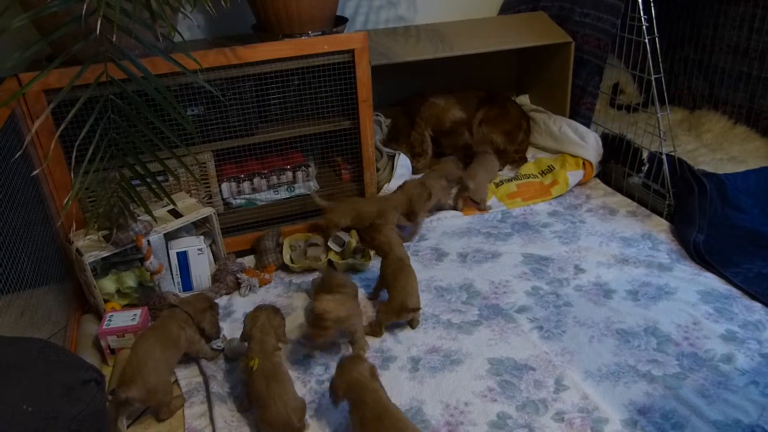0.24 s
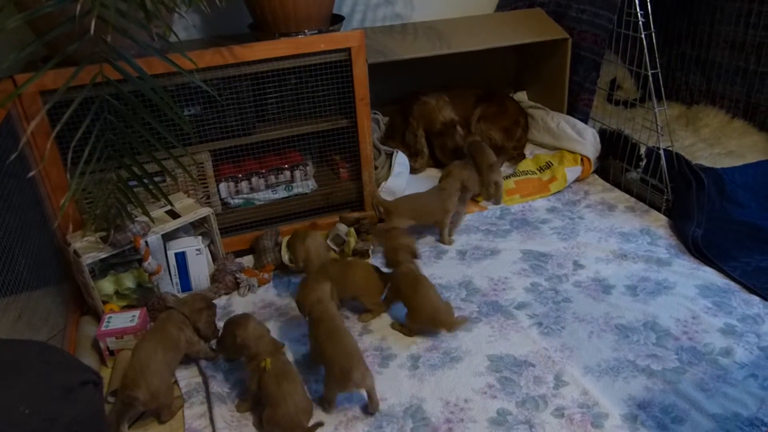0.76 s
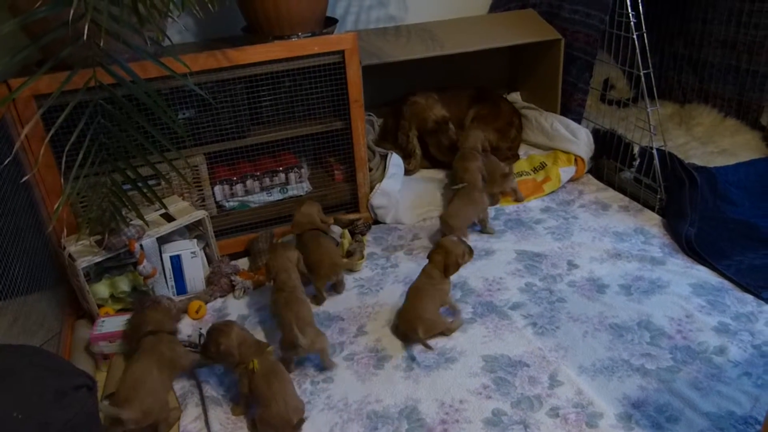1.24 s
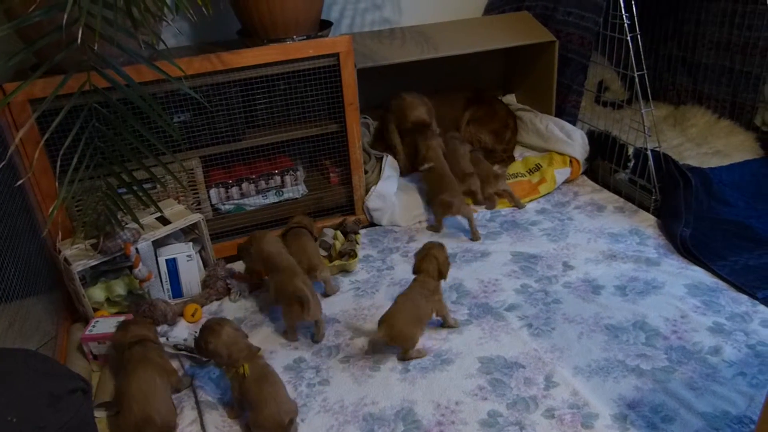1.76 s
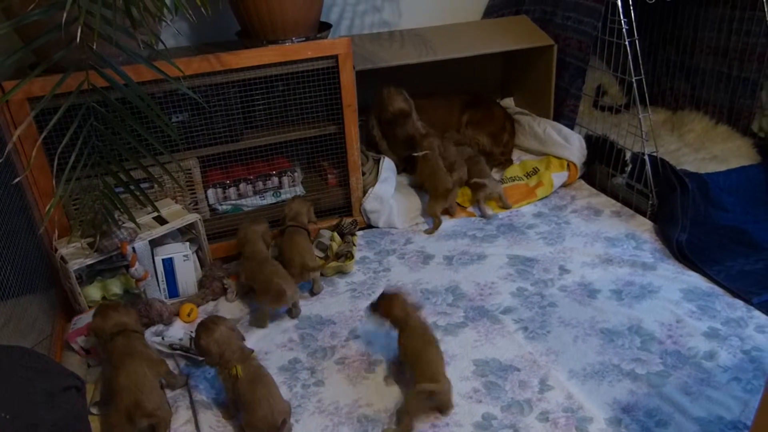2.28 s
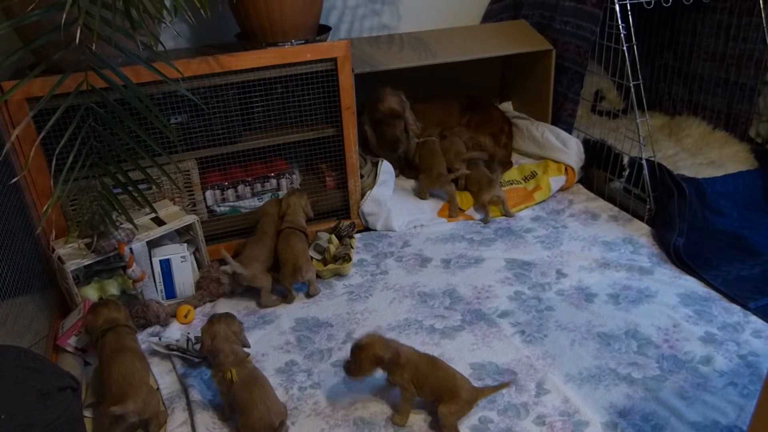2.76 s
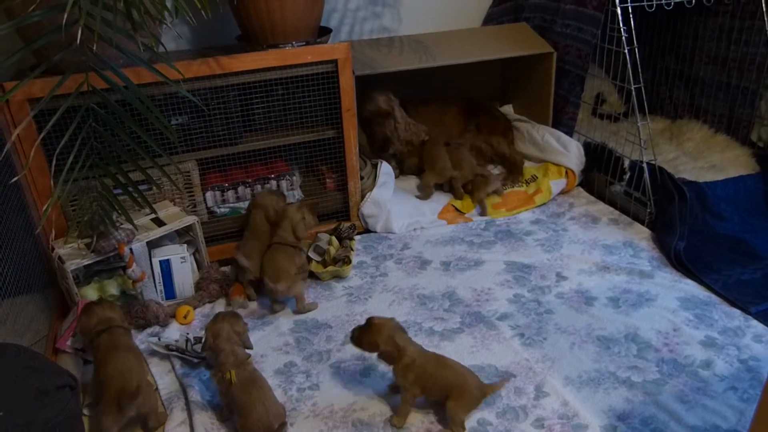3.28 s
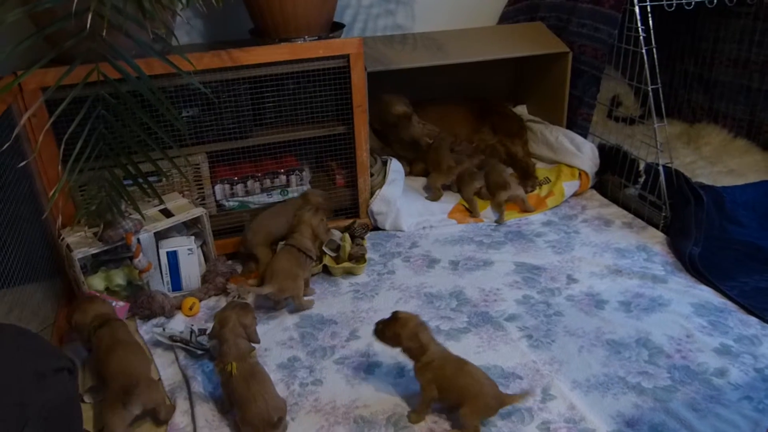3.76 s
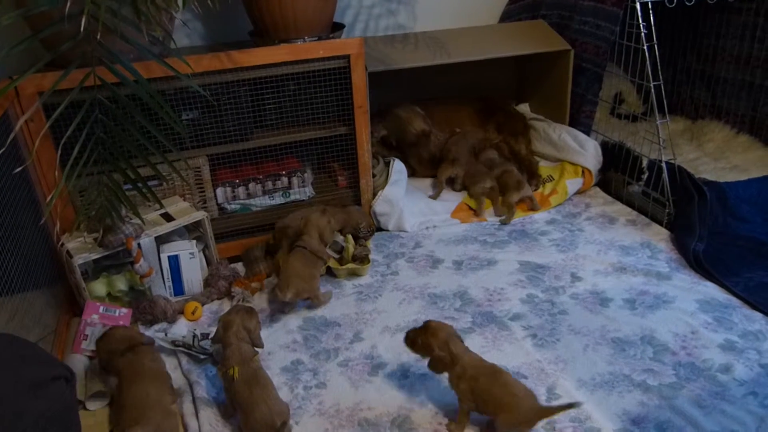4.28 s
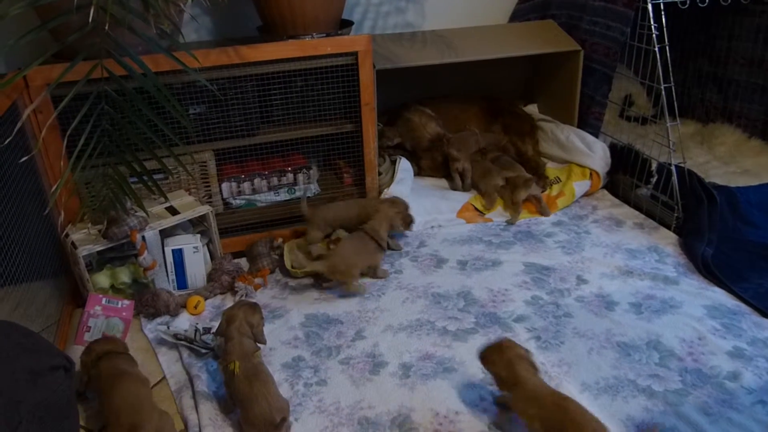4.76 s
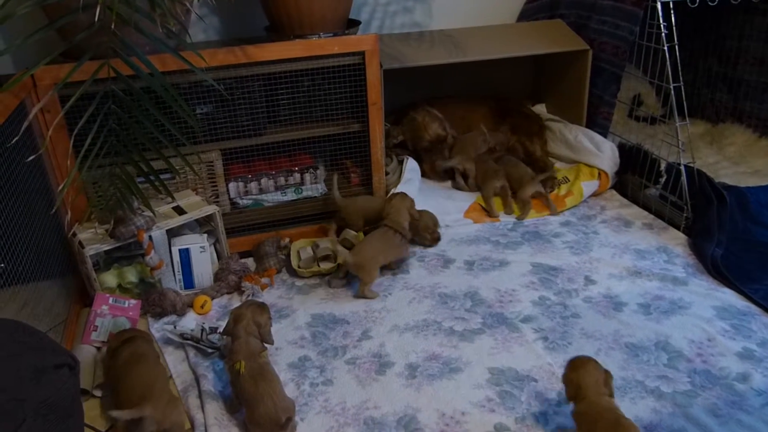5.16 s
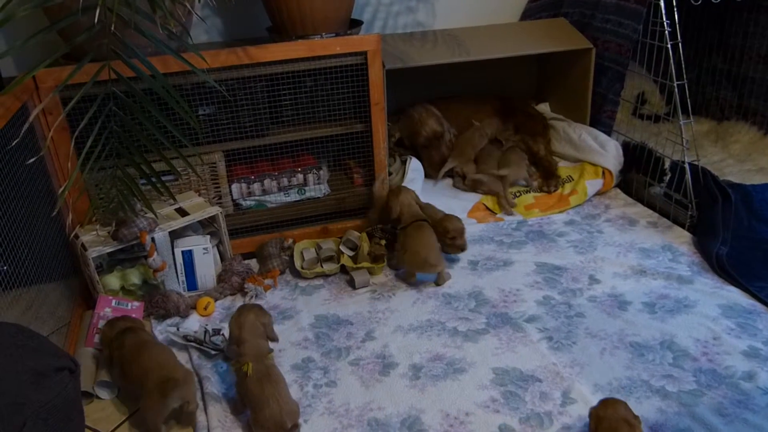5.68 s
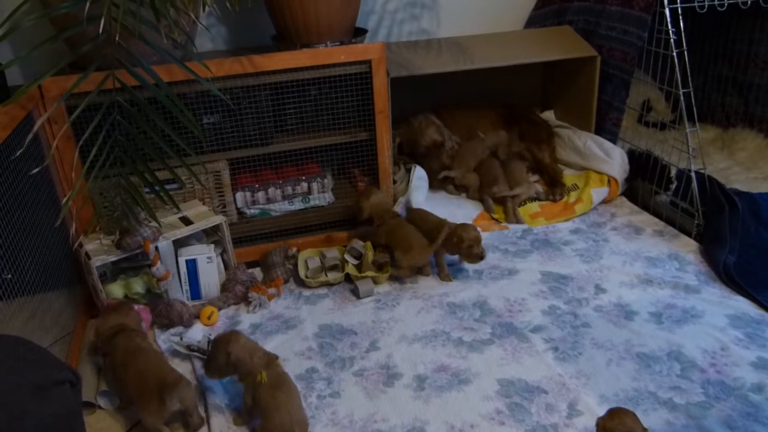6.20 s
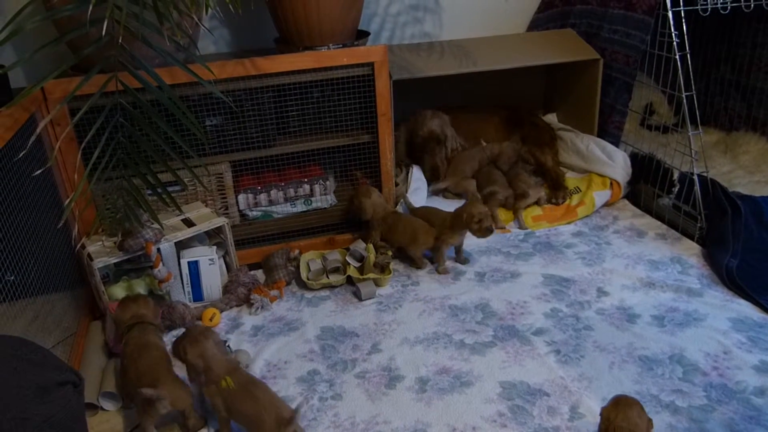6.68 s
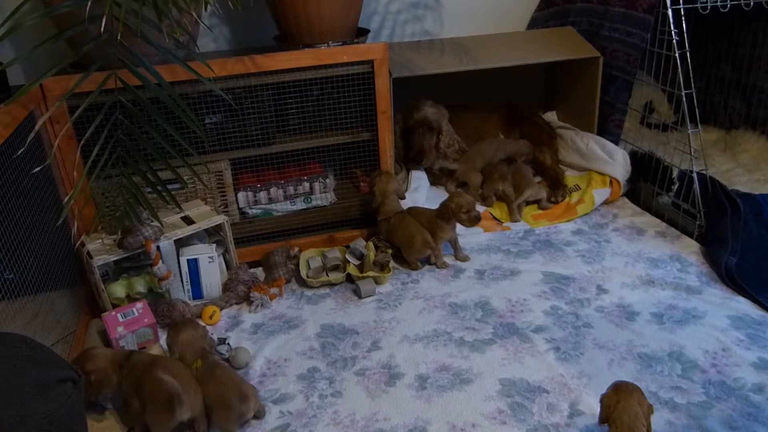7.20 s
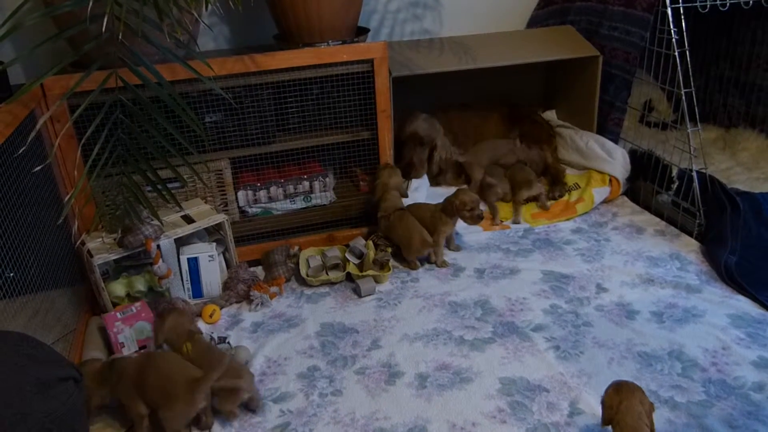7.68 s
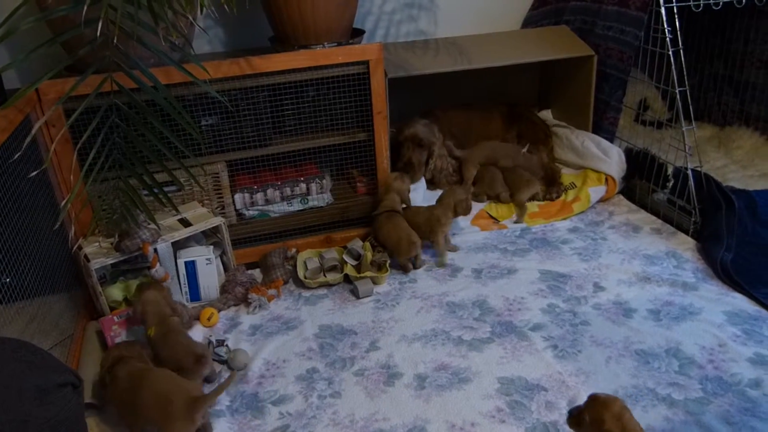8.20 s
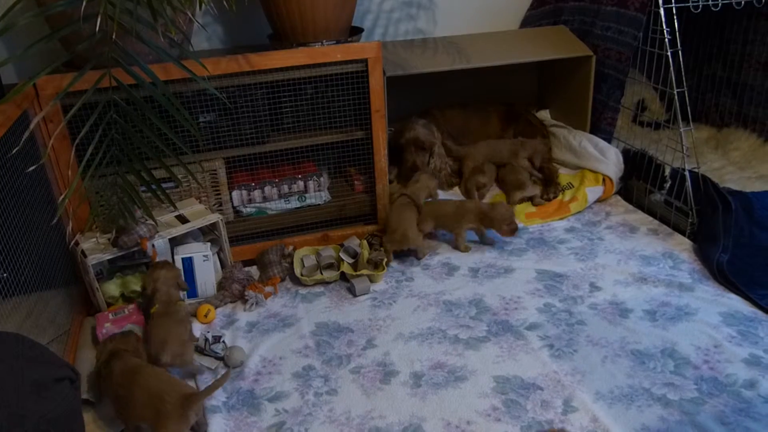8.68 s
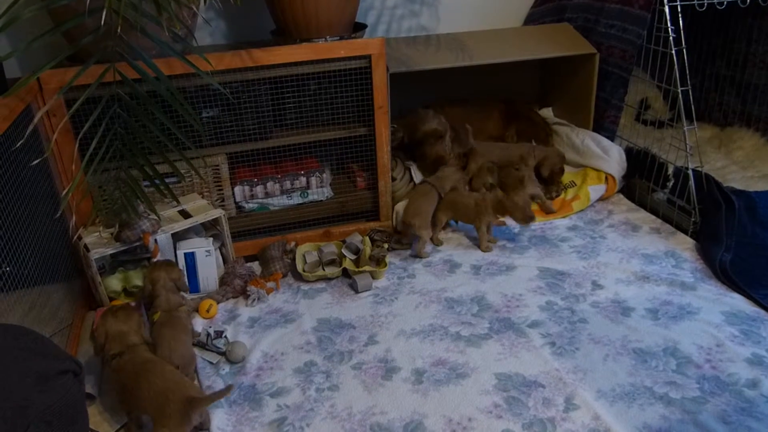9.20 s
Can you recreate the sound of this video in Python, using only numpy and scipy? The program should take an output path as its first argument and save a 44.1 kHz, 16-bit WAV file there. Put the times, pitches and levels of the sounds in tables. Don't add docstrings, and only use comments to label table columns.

```python
import sys
import numpy as np
from scipy import signal
from scipy.fft import rfft, irfft
from scipy.io import wavfile
from scipy.ndimage import uniform_filter1d, minimum_filter1d

SR = 44100
rng = np.random.default_rng(int(sys.argv[2]) if len(sys.argv) > 2 else 0)


def log_audio(samples):
    frames = np.atleast_2d(samples).T
    limited = np.clip(frames, -1, 1)
    pcm = np.round(limited * 32767).astype(np.int16)
    wavfile.write(sys.argv[1], SR, pcm)


def invert_db(x):
    u = np.asarray(x, float) / 20
    return 10 ** u


N = 416304
FFT_HZ = np.arange(N // 2 + 1) * SR / N


def colour_db(table, hz):
    point_hz, db = np.transpose(table)
    return np.interp(np.log(hz + 1), np.log(point_hz), db, left=db[0] - 20.5, right=db[-1] - 49)


def coloured(x, table):
    return irfft(rfft(x) * invert_db(colour_db(table, FFT_HZ)), N)


def left_right_noise(likeness, grains):
    mid, side = rng.standard_normal((2, len(grains))) * grains
    return np.sqrt(1 + likeness) * mid + np.sqrt(1 - likeness) * side * np.array([[1], [-1]])


def pair(table, likeness, grains=np.ones(N)):
    y = coloured(left_right_noise(likeness, grains), table)
    return y / np.sqrt(np.mean(y ** 2))


def walk(steps_per_s, size):
    hold = int(SR / steps_per_s)
    levels = np.repeat(rng.standard_normal(size // hold + 1), hold)
    return 1.308 * uniform_filter1d(levels, hold)[:size]


def sides(pan_db):
    return invert_db(np.array([[pan_db], [-pan_db]]) / 2)


# frequency in Hz, level in dB.
HISS = [(25, -12.5), (60, -19), (125, -20.5), (210, -9), (500, -7.5), (1000, -7.5), (2000, -13.5),
        (3200, -14), (5000, -10), (8000, -19), (15200, -29)]
HISS_DB = -56.5


def hiss():
    return invert_db(HISS_DB + 1.7 * walk(2.587, N)) * pair(HISS, 0.12)


# start in seconds, peak in dB.
THUDS = [(1.779, -58), (2.59, -69), (2.18, -78), (3.651, -68), (4.049, -60), (6.06, -55), (6.515, -49),
         (7, -60.5), (7.3, -68), (7.77, -55), (8.01, -57), (9.149, -66)]
# frequency in Hz, level in dB.
THUD = [(50, -18), (90, -10.5), (140, -4.5), (220, 9), (320, -4.5)]
# centre in seconds, peak in dB.
KNOCKS = [
    (2.6, -65),
    (4.05, -62),
    (5.61, -74),
    (9.17, -74),
]
# frequency in Hz, level in dB.
KNOCK = [(28, -2), (60, -7), (130, -1), (190, -11)]
KNOCK_S = 0.016


def thuds():
    swell = np.zeros(N)
    t = np.arange(SR // 6) / SR
    for start_s, db in THUDS:
        i = int(start_s * SR)
        swell[i:i + len(t)] += invert_db(db - 4) * (t / 0.014) * np.exp(1 - t / 0.017)
    deep = np.zeros(N)
    for centre_s, db in KNOCKS:
        deep += invert_db(db) * np.exp(-((np.arange(N) / SR - centre_s) / KNOCK_S) ** 2)
    return swell * pair(THUD, 0.72) + deep * pair(KNOCK, 0.6)


# start in seconds, level in dB.
CLINKS = [
    (2.574, -36),
    (4.707, -40.5),
    (4.839, -33),
    (2.956, -42),
    (5.957, -56.5),
    (5.99, -54.5),
]
# frequency in Hz, level in dB, t60 in seconds.
TAG = [(4000, 8.5, 0.098), (4140, 0, 0.086), (4900, -0.5, 0.12)]


def clinks():
    out = np.zeros(N)
    t = np.arange(SR // 5) / SR
    for start_s, db in CLINKS:
        i = int(start_s * SR)
        for hz, mode_db, t60_s in TAG:
            detune = rng.standard_normal()
            level = invert_db(db + mode_db + 5.04 * detune - 60 * t / t60_s) * np.minimum(t / 0.004, 1)
            out[i:i + len(t)] += level * np.sin(2 * np.pi * hz * (1 + 0.0032 * detune) * t)
    return out


# start in seconds, peak in dB.
TICKS = [(0.309, -24.5), (0.37, -25.5), (0.468, -32), (0.626, -30.5), (1.007, -25.5), (1.178, -30),
         (1.45, -23), (1.486, -25.5), (2.538, -24.5), (2.565, -20.5), (2.9406, -23), (4.441, -22.5),
         (4.812, -16), (4.835, -25), (5.31, -35.5), (5.429, -36.5), (5.47, -45), (5.9492, -33.5),
         (6.2683, -28.5), (8.117, -31), (8.453, -33.5)]
# start in seconds, peak in dB, low thump in dB re peak.
BUMPS = [(0.1154, -31.5, -0.5), (0.72, -35, -3), (0.877, -32, 5), (1.322, -21, -6), (1.495, -29.5, 3),
         (1.763, -22, -14.5), (2.8009, -28.5, -12.5), (4.578, -32.5, 3.5), (5.591, -30.5, -16),
         (5.612, -49, 10.5), (6.043, -33.5, -8.5), (6.514, -33, -11.5), (6.8166, -33.5, -2.5),
         (6.96, -45.5, 9.5), (7.121, -40.5, 1), (7.308, -49, 8), (7.751, -30.5, -2.5), (7.998, -38, 3.5),
         (8.785, -36, 2)]
# frequency in Hz, level in dB.
SCUFF = [(1500, -6), (3000, -1.5), (3900, 3), (4350, 1.5), (4900, 2.5), (6500, -2), (9000, -10.5),
         (15200, -32)]
# frequency in Hz, level in dB.
SCUFF_BODY = [(350, -19.5), (700, -2.5), (1300, 3), (2200, -5), (3200, -1)]
TICK_THUMP_DB, TICK_S, BUMP_S = -18, 0.029, 0.016


def bumps():
    scrape, thump = np.zeros((2, N))
    t = np.arange(SR // 8) / SR
    hits = [(s, db, TICK_THUMP_DB, TICK_S) for s, db in TICKS]
    hits += [(s, db, low_db, BUMP_S) for s, db, low_db in BUMPS]
    for start_s, db, low_db, fall_s in hits:
        span = slice(int(start_s * SR), int(start_s * SR) + len(t))
        scrape[span] += invert_db(db - 10.5) * np.minimum(t / (0.063 * fall_s), 1) * np.exp(-t / fall_s)
        thump[span] += invert_db(db + low_db - 5) * np.minimum(t / 0.0035, 1) * np.exp(-t / 0.021)
    scrape_noise = pair(SCUFF, 0.69, invert_db(2.5 * walk(300, N)))
    return scrape * scrape_noise + thump * pair(SCUFF_BODY[:3], 0.79)


# time in seconds, level in dB.
BUSTLE = [(0, -50), (.75, -59), (1.2, -48), (2.4, -59), (3.0, -48), (4, -50), (4.9, -47.5), (5.05, -59.5),
          (5.4, -64), (5.9, -70), (6.3, -54.5), (7.45, -64), (8.1, -64.5), (8.6, -68.5), (9.44, -61.5)]
LEAD_IN = 0.62


def swells(moves, bed_db):
    t = np.arange(0, N, 64) / SR
    power = invert_db(2 * (np.interp(t, *np.transpose(BUSTLE)) + bed_db))
    for fastest_s, db, length_s in moves:
        distance_s = np.maximum(t - fastest_s, (fastest_s - t) / LEAD_IN)
        power += invert_db(2 * db) * np.exp(-2 * distance_s / length_s)
    return np.interp(np.arange(N) / SR, t, np.sqrt(power))


SCUFF_PATCH_DB, SCUFF_PATCHES_PER_S = 3.5, 18


def patchy(x):
    spectrum = rfft(x)
    half_octave = np.log2(FFT_HZ / 2000 + 1e-9) * 2
    out = 0
    for k in range(6):
        share = np.interp(half_octave, np.arange(6), np.arange(6) == k)
        gain = invert_db(SCUFF_PATCH_DB * (walk(SCUFF_PATCHES_PER_S, N) - 0.2))
        out = out + irfft(spectrum * share, N) * gain
    return out


# fastest moment in seconds, scuff in dB, body in dB re scuff,
# length in seconds.
STROKES = [(.005, -31, -12, 0.02), (0.309, -37.5, -5, 0.07), (0.605, -49.5, -25, 0.13),
           (0.886, -41.5, -4.5, 0.04), (1.05, -54.5, 10, 0.12), (1.338, -39, -2, 0.045),
           (1.493, -32.5, 4.5, 0.04), (1.753, -41.5, 7.5, 0.062), (1.985, -44, -2.5, 0.24),
           (2.243, -38.5, -23, 0.043), (2.617, -38, -5, 0.075), (2.962, -46, 2, 0.022),
           (3.145, -40.5, -6.5, 0.058), (3.32, -38, -5.5, 0.043), (3.41, -37, -8.5, 0.031),
           (3.687, -42, 3.5, 0.058), (4.11, -38.5, -0.5, 0.084), (4.451, -24, -16, 0.029),
           (4.669, -44, -1.5, 0.12), (4.83, -27.5, -5.5, 0.057), (4.907, -39, 0, 0.06),
           (5.176, -35, -23, 0.039), (5.611, -43.5, -1.5, 0.031), (5.694, -40, -6, 0.038),
           (6.41, -45, -20, 0.063), (6.526, -51.5, 11.5, 0.023), (6.69, -48.5, -30, 0.23),
           (7.109, -45, -4, 0.091), (7.793, -56.5, 1, 0.28), (8.197, -51.5, -1.5, 0.11),
           (8.784, -39.5, -8, 0.037), (9.18, -54.5, -7, 0.099), (9.43, -41, -20, 0.017)]
# fastest moment in seconds, level in dB.
SHOVES = [(.01, -72), (.36, -59), (.89, -47.5), (1.346, -33), (1.71, -56), (2.18, -48), (2.42, -62.5),
          (3.7, -37), (4.13, -47), (4.491, -35), (5.63, -42.5), (6.07, -47), (6.57, -54.5), (6.839, -38.5),
          (6.97, -41), (7.329, -48.5), (7.81, -42), (8.03, -45), (8.1, -60), (8.4, -61), (8.83, -42)]
# frequency in Hz, level in dB.
SHUFFLE = [(60, -35.5), (130, -12), (250, -2), (450, 5.5), (800, 9.5), (1400, -51)]
SHOVE_S = 0.038
GRAIN_DB, PATCH_DB = 2.7, 3.4
SCUFF_BED_DB, BODY_BED_DB, SHUFFLE_BED_DB = -0.24, -4, -16


def paws():
    grain = np.repeat(rng.exponential(size=N // 40 + 1), 40)[:N]
    grains = invert_db(GRAIN_DB * grain + PATCH_DB * walk(35, N))
    scuffs = [(s, db, length_s) for s, db, _, length_s in STROKES]
    bodies = [(s, db + body_db, length_s) for s, db, body_db, length_s in STROKES]
    shoves = [(s, db, SHOVE_S) for s, db in SHOVES]
    out = patchy(pair(SCUFF, 0.66, grains)) * swells(scuffs, SCUFF_BED_DB)
    out += pair(SCUFF_BODY, 0.9, grains) * swells(bodies, BODY_BED_DB)
    out += pair(SHUFFLE, 0.1, invert_db(6.4 * walk(20, N))) * swells(shoves, SHUFFLE_BED_DB)
    return out


# frequency in Hz, level in dB.
THROAT = [(300, 8.5), (900, 3), (2000, 8), (3300, -15.5), (4200, -12), (5600, -8.5), (8000, -18.5),
          (13500, -34.5)]
RISE_BEND, FADE_BEND = 2.1, 0.46


def call(row, h):
    start_s, length_s, top_hz, end_hz, db = row
    u = np.linspace(max(-start_s / length_s, 0), 1, num=40)

    def ramp(a, b):
        return np.clip((u - a) / (b - a), 0, 1)

    top_at, loud_at = np.clip([h["top_at"], h["loud_at"]], 0.05, 0.95)
    below_top = (1 - h["start"]) * (1 - ramp(h["dwell"], top_at)) ** RISE_BEND
    drop = ramp(top_at + h["hold"], h["land"])
    sag = (1 - h["ease"]) * drop ** h["sag"] + h["ease"] * np.sin(drop * np.pi / 2) ** 2
    hz = top_hz * (1 - below_top) + (end_hz - top_hz) * sag
    level_db = db - h["swell_db"] * (1 - ramp(0, loud_at))
    level_db -= h["fade_db"] * ramp(loud_at, 0.99) ** FADE_BEND
    level_db += h["throat"] * (colour_db(THROAT, hz) - max(gain_db for _, gain_db in THROAT))
    return np.transpose([np.maximum(start_s + u * length_s, 0), hz, level_db])


OVERTONE_DB = -1.5
FALL_ROUGH, SHIMMER_DB = 0.035, 1.8
EDGE_S = 0.0026


def voice(table, h):
    s, hz, db = np.transpose(table)
    first = int(s[0] * SR)
    t = np.arange(first, min(int(s[-1] * SR), N)) / SR
    size = len(t)
    glide = uniform_filter1d(np.interp(t, s, hz), size=450, mode="nearest")
    fall = 1 - glide / np.maximum.accumulate(glide)
    pitch = glide * (1 + (h["rough"] + FALL_ROUGH * fall) * walk(109.53, size))
    phase = 2 * np.pi * np.cumsum(pitch) / SR
    out = np.sin(phase)
    for k in range(2, 9):
        gain_db = h["open_db"] + h["gape_db"] * fall + h["odd_db"] * (k % 2)
        gain_db += OVERTONE_DB * np.log2(k) - 7.3 * fall * np.log2(k / 2)
        gain_db += colour_db(THROAT, k * pitch) - colour_db(THROAT, pitch)
        gain_db += 0.98 * SHIMMER_DB * walk(63, size)
        out += invert_db(gain_db) * (k * pitch < 0.45 * SR) * np.sin(k * phase)
    breath_band = signal.butter(2, [4200, 10500], "bandpass", fs=SR, output="sos")
    air = signal.sosfilt(breath_band, rng.standard_normal(size))
    out += invert_db(h["air_db"]) * air * (1 + np.sin(phase))
    since_s = t - t[0] + (s[0] <= 0)
    left_s = t[-1] - t + (s[-1] * SR >= N - 1)
    edge = np.sin(np.clip(np.minimum(since_s, left_s) / EDGE_S, 0, 1) * np.pi / 2) ** 2
    shimmer_db = SHIMMER_DB * (1.23 + 0.48 * fall) * walk(101.5, size)
    return first, np.sqrt(2) * out * edge * invert_db(np.interp(t, s, db) + shimmer_db)


# start in seconds, length in seconds, top pitch in Hz,
# end pitch in Hz, level in dB.
NAGGER = [(3.632, 0.19, 1841, 880, -26.5), (3.982, 0.22, 1779, 840, -25.5), (4.38, .185, 1810, 920, -26.5),
          (4.725, 0.21, 1790, 864, -26)]
BRIGHT = [(.195, .152, 1913, 1417, -19.5)]
YELPER = [(6.316, .186, 3194, 3210, -14)]
ECHOER = [(6.605, 0.24, 3123, 2790, -21)]
SHRILL = [(6.975, .19, 2600, 1227, -29.5)]
SMALL = [(1.27, .105, 1470, 1153, -33.5)]
RISER = [(.99, 0.085, 1032, 956, -42.5), (3.048, 0.075, 955, 930, -41)]
PEEPER = [(1.575, .075, 1335, 1305, -31.5)]
EAGER = [(1.865, .14, 1922, 1304, -22)]
ARCHER = [(8.085, .105, 2394, 1644, -32.5)]
PLUMP = [(.49, .14, 1401, 1232, -29)]
SLIDER = [(3.33, .135, 1956, 900, -25)]
SIGHER = [(7.788, .12, 1880, 1430, -36.5), (7.535, .09, 1990, 1250, -36)]
CLIMBER = [(2.5, .085, 1450, 1420, -36)]
OPENER = [(-0.0185, .08, 2031, 1850, -18.5)]
WARBLER = [(1.074, .053, 652.4, 875, -42.5)]
FAR_SIDE = [(9.122, .118, 2179, 2085, -20.5), (9.39, 0.076, 1788, 1700, -27.5)]
HUMMER = [(.7, 0.067, 739, 715, -48), (.8, 0.1, 739.4, 725, -41)]
DROPPER = [(1.49, .083, 887.5, 852, -29)]
WHIMPERER = [(.875, 0.053, 975, 1010, -38), (1.86, 0.12, 879.3, 786, -32), (6.96, 0.049, 747, 580, -42.5),
             (7.91, 0.034, 1000, 930, -51.5)]
SHY = [(2.16, .115, 1566, 1190, -38.5)]
SNIVELLER = [(2.275, .05, 1185, 1100, -34.5), (5.1, 0.091, 1250, 1100, -46.5),
             (5.9, 0.095, 1340, 1500, -61.5), (5.47, 0.056, 650, 680, -55)]
MUMBLER = [(1.668, 0.075, 622, 610, -34.5)]
BUMPY = [(5.115, .058, 1142, 920, -39.5)]
CROAKER = [(7.307, 0.03, 960, 900, -46), (6.493, .018, 720, 620, -46), (7.118, .025, 1120, 950, -43),
           (5.425, .065, 1340, 1300, -53), (1.455, .022, 1450, 1400, -39)]
PIPER = [(6.292, .016, 2037, 2040, -14.5), (6.905, 0.05, 1390, 1100, -38.5)]
LONER = [(8.893, .06, 2060, 2295, -24)]
GRUNTER = [(2.16, 0.09, 409, 380, -55), (2.39, 0.08, 335, 298, -58), (3.635, 0.11, 569.4, 539, -41.5),
           (8.79, 0.044, 642, 600, -42), (5.27, 0.036, 473, 460, -61), (5.61, 0.045, 471, 430, -51)]
MANNER = dict(dwell=0, hold=0, land=0.99, sag=1.45, ease=0, throat=0, air_db=-39.5, gape_db=0)
# start (share of the top pitch), top_at and loud_at (shares
# of the length), swell_db and fade_db, open_db (all overtones), odd_db (odd ones), pan_db (left over right),
# rough (pitch jitter, share), and any of MANNER.
LITTER = [ (NAGGER, dict(start=.74, top_at=.33, hold=0.054, land=1.03, ease=0.5, gape_db=11, loud_at=0.41, swell_db=10, fade_db=14.5, open_db=-2, odd_db=3, pan_db=2, rough=0.0203)),
          (BRIGHT, dict(start=.77, top_at=.52, hold=0.121, loud_at=0.54, swell_db=17.5, fade_db=10, open_db=-8, odd_db=12.5, pan_db=3.5, rough=0.0075)),
          (EAGER, dict(start=.76, top_at=0.43, loud_at=0.46, swell_db=15, fade_db=17.5, open_db=-5, odd_db=1.5, pan_db=1.5, rough=0.006)),
          (FAR_SIDE, dict(start=.77, top_at=.75, loud_at=0.35, swell_db=19.5, fade_db=21, open_db=5.5, odd_db=-1.5, pan_db=-3.5, air_db=-33, rough=0.0063)),
          (YELPER, dict(start=.6, top_at=.42, loud_at=0.088, swell_db=10, fade_db=37, open_db=-10, odd_db=-12.5, pan_db=5, rough=0.0085, dwell=0.071)),
          (ECHOER, dict(start=.575, top_at=0.44, sag=1.1, loud_at=0.19, swell_db=12.5, fade_db=35, open_db=-10, odd_db=-19, pan_db=4.5, rough=0.014, dwell=.13)),
          (SHRILL, dict(start=.74, top_at=.33, dwell=.08, hold=.1, land=1.02, sag=.75, ease=0.11, throat=0.87, loud_at=0.58, swell_db=2.5, fade_db=10.5, open_db=-11.5, odd_db=14, pan_db=4.5, rough=0.025)),
          (ARCHER, dict(start=.78, top_at=.47, hold=0.081, sag=1.5, throat=1, loud_at=0.91, swell_db=4, fade_db=4, open_db=-9, odd_db=-1, pan_db=4.5, rough=0.015)),
          (SMALL, dict(start=.88, top_at=0.407, loud_at=0.29, swell_db=16, fade_db=5.5, open_db=2.5, odd_db=1, pan_db=2, rough=0.011)),
          (PLUMP, dict(start=.91, top_at=0.401, dwell=0.25, sag=.9, loud_at=0.566, swell_db=14, fade_db=12.5, open_db=4, odd_db=-1, pan_db=4, rough=.015)),
          (SLIDER, dict(start=.9, top_at=.3, hold=0.06, land=1.02, ease=.5, gape_db=18, loud_at=0.37, swell_db=5, fade_db=13.5, open_db=-8.5, odd_db=7.5, pan_db=1, rough=0.014)),
          (SIGHER, dict(start=0.94, top_at=0.18, hold=.28, ease=0.38, loud_at=0.54, swell_db=11.5, fade_db=12.5, open_db=0.5, odd_db=-2.5, pan_db=5.5, rough=0.016)),
          (RISER, dict(start=0.61, top_at=.85, loud_at=1, swell_db=6.5, fade_db=-2, open_db=2, odd_db=-2, pan_db=1.5, rough=0.019)),
          (CLIMBER, dict(start=0.78, top_at=.62, loud_at=0.54, swell_db=12, fade_db=2.5, open_db=6, odd_db=0, pan_db=2, rough=0.0195)),
          (PEEPER, dict(start=1.09, top_at=0.46, dwell=.15, loud_at=0.63, swell_db=10, fade_db=12, open_db=-4, odd_db=6.5, pan_db=2, rough=0.025)),
          (OPENER, dict(start=1, top_at=0.73, loud_at=.7, swell_db=9.5, fade_db=10.5, open_db=3.5, odd_db=-0.5, pan_db=-2, rough=0.0052)),
          (WARBLER, dict(start=1, top_at=0.457, sag=1.79, loud_at=0.44, swell_db=-0.5, fade_db=-3, open_db=-6, odd_db=11.5, pan_db=2, rough=0.011)),
          (HUMMER, dict(start=1.03, top_at=0.41, loud_at=0.48, swell_db=12.5, fade_db=3.5, open_db=4, odd_db=-4, pan_db=3.5, rough=0.016)),
              (DROPPER, dict(start=1.8, top_at=0.46, loud_at=0.65, swell_db=10, fade_db=11, open_db=-12, odd_db=1, pan_db=3, rough=0.021)),
              (WHIMPERER, dict(start=0.86, top_at=0.31, loud_at=0.36, swell_db=11, fade_db=12.5, open_db=-9, odd_db=-5, pan_db=7, rough=0.0275)),
              (SHY, dict(start=0.88, top_at=0.52, land=1.02, ease=.8, loud_at=0.22, swell_db=8, fade_db=2.5, open_db=6, odd_db=-8, pan_db=2.5, rough=0.0277)),
              (SNIVELLER, dict(start=1.01, top_at=0.33, loud_at=.3, swell_db=6, fade_db=5, open_db=-6, odd_db=-5.5, pan_db=2.5, rough=.05)),
              (MUMBLER, dict(start=1.5, top_at=.45, loud_at=0.45, swell_db=6.5, fade_db=10, open_db=-18, odd_db=4, pan_db=2.5, rough=0.018)),
              (BUMPY, dict(start=.81, dwell=.3, top_at=0.69, loud_at=0.4, swell_db=6.5, fade_db=7.5, open_db=-3.5, odd_db=-3, pan_db=2.5, rough=.04)),
              (CROAKER, dict(start=.9, top_at=.4, loud_at=.4, swell_db=4, fade_db=6, open_db=-16, odd_db=-3, pan_db=4, rough=.06)),
              (PIPER, dict(start=1, top_at=0.27, loud_at=0.75, swell_db=14.5, fade_db=3, open_db=-10.5, odd_db=-1.5, pan_db=3, rough=0.011)),
              (LONER, dict(start=0.99, top_at=0.516, loud_at=.6, swell_db=12.5, fade_db=15, open_db=-0.5, odd_db=1, pan_db=-3.5, air_db=-35, rough=0.018)),
              (GRUNTER, dict(start=1.1, top_at=.3, loud_at=0.25, swell_db=-5.5, fade_db=8, open_db=-15.5, odd_db=-12, pan_db=6.5, rough=0.12)),]


def puppies():
    out = np.zeros((2, N))
    for calls, habits in LITTER:
        h = {**MANNER, **habits}
        for row in calls:
            i, x = voice(call(row, h), h)
            out[:, i:i + len(x)] += x * sides(h["pan_db"])
    return out


# delay in seconds, level in dB.
ECHOES = [(.0021, -19.5), (.0063, -16.5), (0.0107, -12.5), (.019, -11.5)]


def echoes(x):
    out = x.copy()
    for delay_s, db in ECHOES:
        lag = int(delay_s * SR)
        out[:, lag:] += invert_db(db) * x[:, :N - lag]
    return out


# centre in Hz, t60 in seconds, level in dB.
ROOM = [(100, 0.45, -3.5), (348.7, 0.65, -6), (900, 0.36, -1), (2050, 0.41, -4), (5000, 0.47, -8.5),
        (11000, 0.16, -4.5)]
WALL_LIKENESS = 0.61
STIR_S, STIRS_PER_S = 0.00022, 60


def room(x):
    t = np.arange(SR * 3 // 4) / SR
    log_hz = np.log(np.fft.rfftfreq(len(t), 1 / SR) + 1)
    noise = rfft(left_right_noise(WALL_LIKENESS, np.ones(len(t))))
    centres = np.log([row[0] for row in ROOM])
    tail = 0
    for k, (_, t60_s, db) in enumerate(ROOM):
        share = np.interp(log_hz, centres, np.arange(len(ROOM)) == k)
        fade = np.exp(-np.log(1000) * t / t60_s) * np.clip((t - 0.003) / 0.0047, 0, 1)
        tail = tail + irfft(noise * share, len(t)) * fade * invert_db(db) / np.sqrt(2 * np.sum(fade ** 2))
    stirred_time = np.arange(N) + STIR_S * SR * walk(STIRS_PER_S, N)
    stirred = np.interp(stirred_time, np.arange(N), x.mean(axis=0))
    return x + signal.fftconvolve(stirred[None], tail, axes=1)[:, :N]


PAWS_PAN_DB, PUPPIES_DB = 4, 2


def scene():
    floor = sides(PAWS_PAN_DB) * (thuds() + clinks() + bumps() + paws())
    return hiss() + room(echoes(invert_db(PUPPIES_DB) * puppies() + floor))


def top_cut(x):
    return signal.sosfilt(signal.butter(12, 15150, fs=SR, output="sos"), x)


# frequency in Hz, gain in dB.
MICROPHONE = [(20, 3.5), (2400, 1.02), (2800, -3), (3800, 0), (4350, -1.5), (4900, 0.9), (13000, 3),
              (15100, -21), (15300, -47)]
CEILING, OFFSET = 0.56, -0.0031


def record(dry):
    heard = coloured(dry, MICROPHONE)
    peak_gain = CEILING / np.maximum(np.abs(heard).max(axis=0), CEILING)
    gain = uniform_filter1d(minimum_filter1d(peak_gain, size=601), size=301)
    return top_cut(heard * gain + OFFSET)


dry = scene()
out = record(dry)
log_audio(out)
```